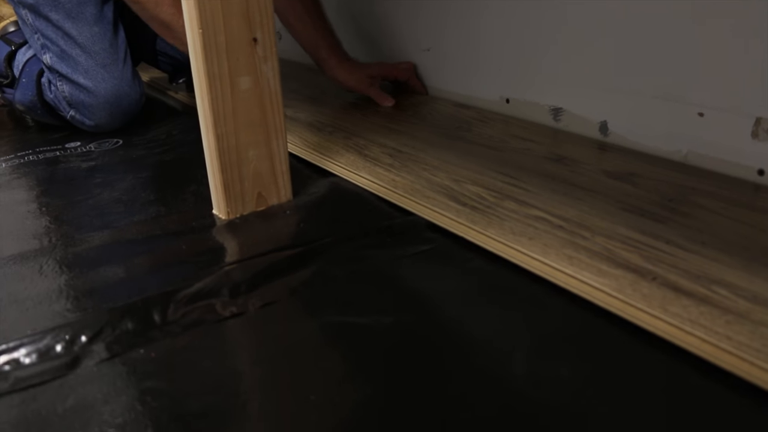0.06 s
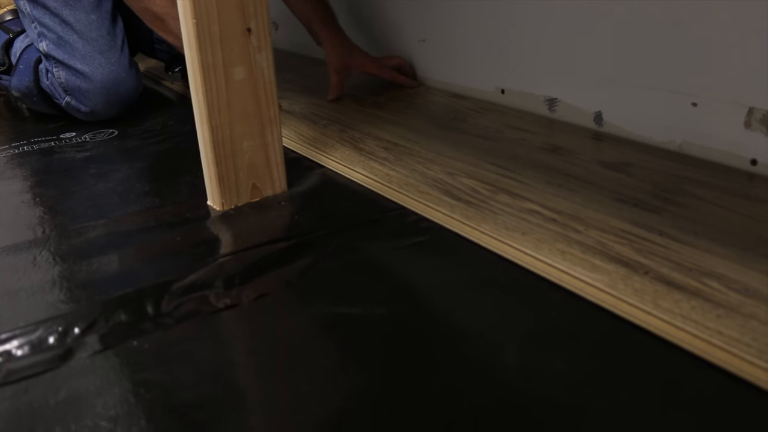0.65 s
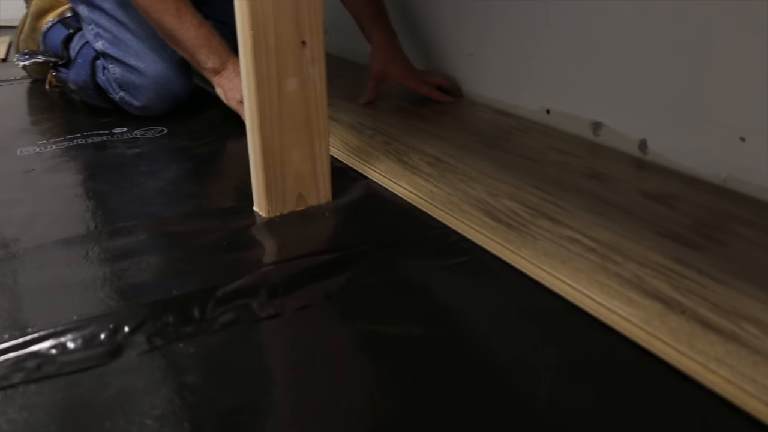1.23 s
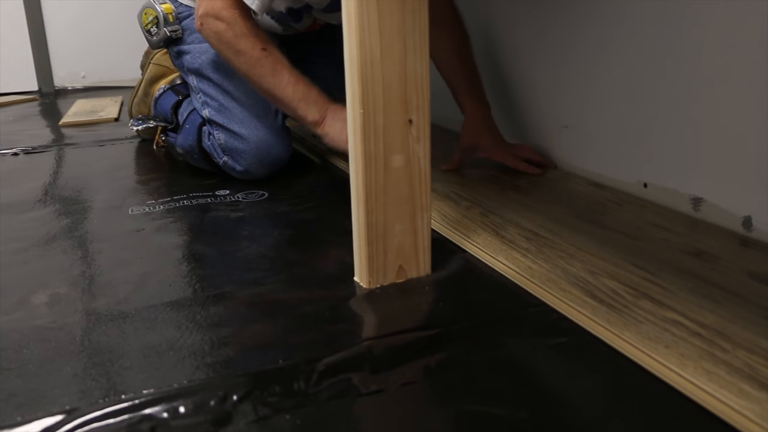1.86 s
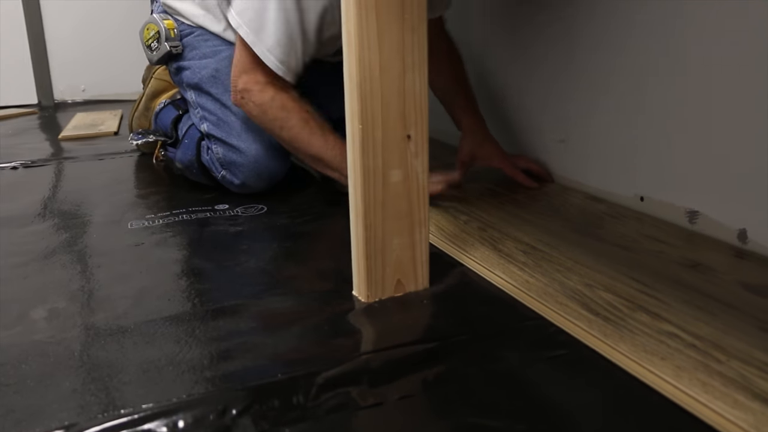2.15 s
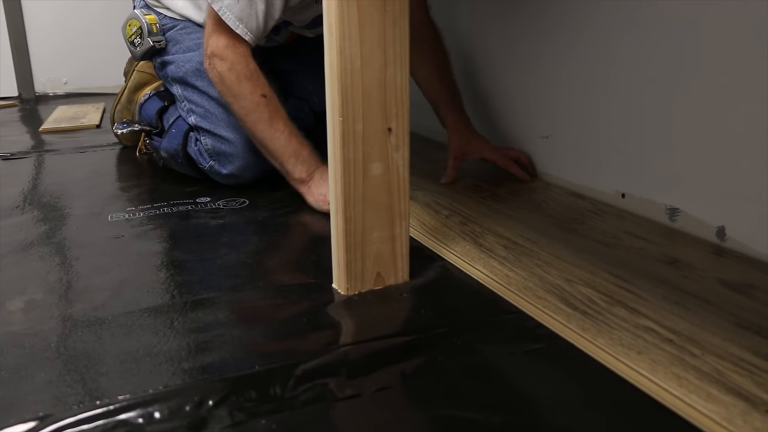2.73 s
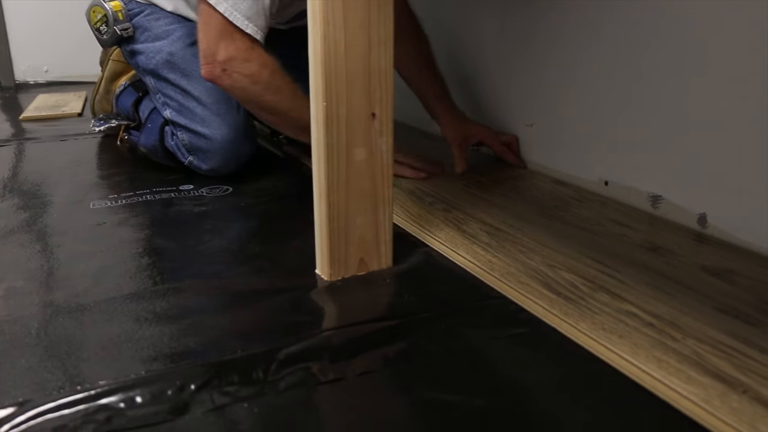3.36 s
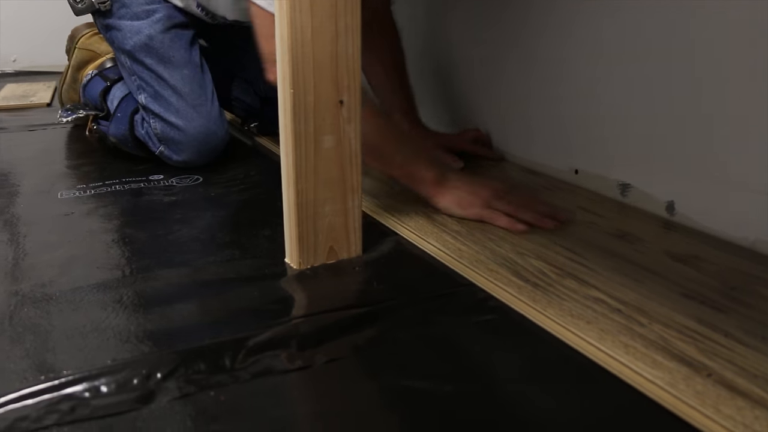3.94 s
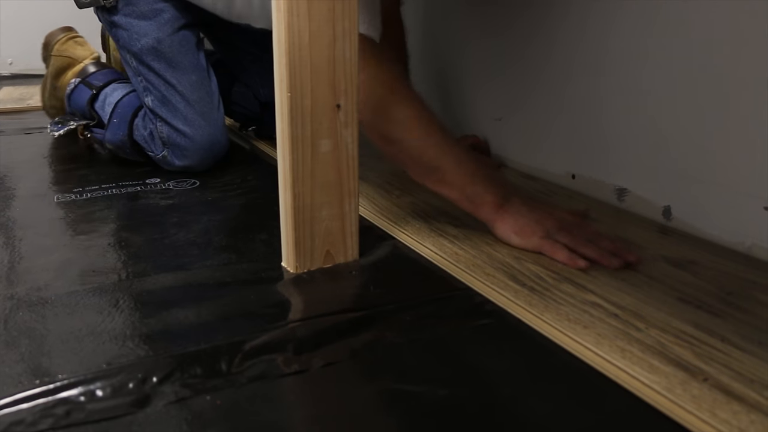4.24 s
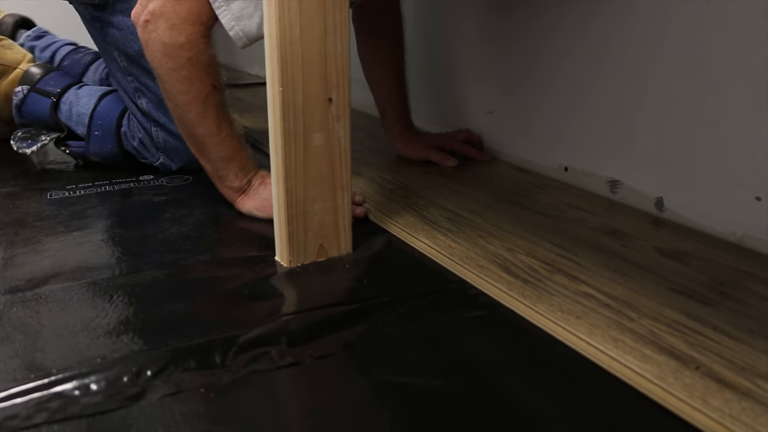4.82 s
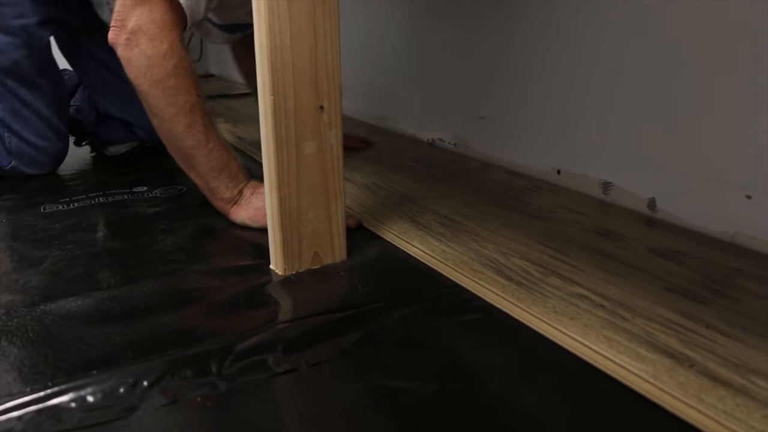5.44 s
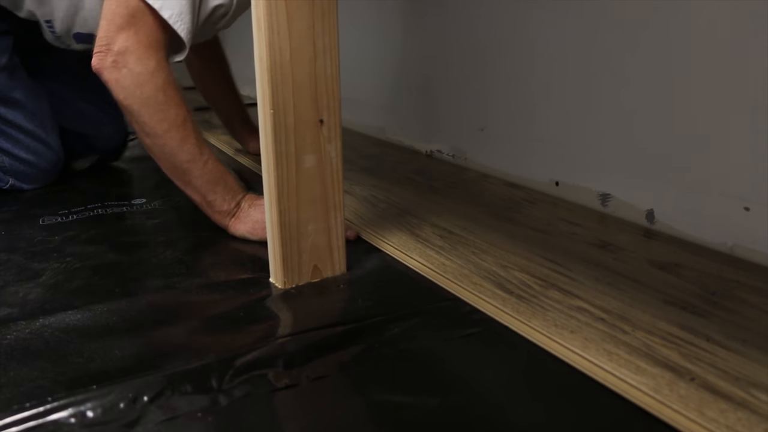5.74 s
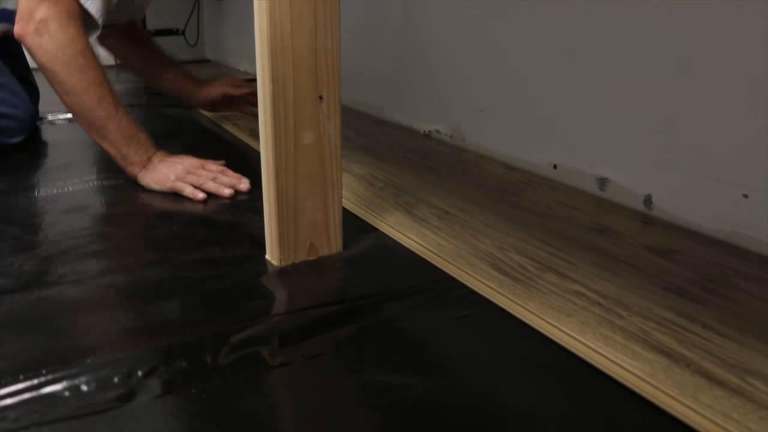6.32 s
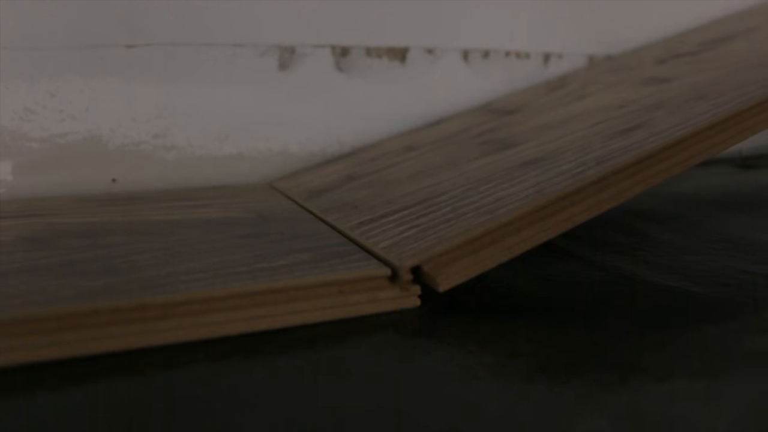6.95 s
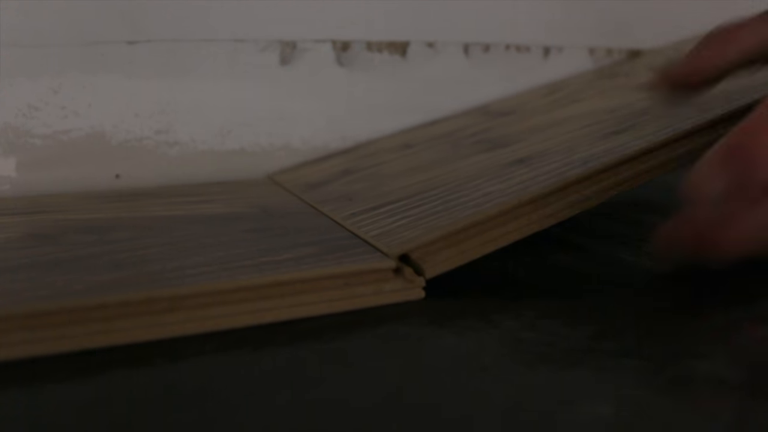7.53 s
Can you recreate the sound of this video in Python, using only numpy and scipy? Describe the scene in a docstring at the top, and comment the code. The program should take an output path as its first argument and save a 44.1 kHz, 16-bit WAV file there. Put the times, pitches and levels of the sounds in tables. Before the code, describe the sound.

In a bare room with a low steady hum, a laminate plank drops flat with one loud, woody slap and a short echo. A palm wipes along it and back with a soft hiss. Knees and hands shuffle over plastic sheeting, with faint rasps, a soft thud and a small click from the joint. Then, heard from close by, the next plank is worked into the groove with dull thuds and light scrapes.

```python
"""A bare room: a worker lays laminate planks on plastic sheeting. One plank slaps down flat and rings,
a palm wipes along it and back, knees shuffle over the sheet and the joint clicks home.
Then, heard from close by, the next plank is angled into the groove with soft thuds and scrapes.
Rubbing is a stream of tiny friction slips. Blows ring damped modes and echo off the walls."""
import sys
import numpy as np
from scipy import signal
from scipy.fft import rfft, irfft, next_fast_len
from scipy.io import wavfile
from scipy.ndimage import uniform_filter1d

SR = 44100
rng = np.random.default_rng(int(sys.argv[2]) if len(sys.argv) > 2 else 0)


def unload_audio(sound):
    """Save the sound as a 16-bit wav file, at the path given as the first command line argument."""
    columns = np.transpose(np.atleast_2d(sound))
    # keep every value between -1 and 1, then stretch to whole-number steps
    steps = np.round(np.clip(columns, -1, 1) * 32767)
    wavfile.write(sys.argv[1], SR, steps.astype(np.int16))


N = 338813
TIME_S = np.arange(N) / SR
RING_S = TIME_S[:SR // 2]  # time axis of one blow
CLOSE_S = 6.642  # the listener jumps close to the joint

# Room tone spectra, far and close. Each row: frequency in Hz, gain in dB.
FAR_AIR = [(25, -5.5), (45, -14), (85, -17), (115, -2.5), (260, -1.5), (600, -3.5), (900, -2.5), (1500, -8),
           (2000, -11), (4000, -14), (5500, -16), (7500, -15.5), (11000, -20), (15500, -27.5)]
NEAR_AIR = [(25, -24), (70, -16), (170, -4), (350, -2), (480, -7), (650, -6), (950, -5.5), (1550, -11.5),
            (2000, -12), (3000, -16.5), (5000, -20), (7500, -18.5), (10000, -23), (15500, -30)]
# Hum and drone lines, far and close. Each row: frequency in Hz, width in Hz, level in dB.
FAR_HUM = [(70.8, 7.7, -69), (205.5, 28, -73.5), (293.7, 8.9, -65), (428, 54, -64), (513, 11, -67),
           (756.3, 25, -68.5), (889, 43, -69)]
NEAR_HUM = [(140.7, 6.6, -65), (747, 100, -62), (1275, 89, -66)]
# Room echo decay. Each row: frequency in Hz, T60 in seconds.
ROOM_DECAY = [(80, 0.63), (400, 0.3244), (1200, 0.2), (4000, 0.39), (14000, 0.4)]
# Stereo width of room tone, echo and rubbing. Each row: frequency in Hz, side minus mid in dB.
AIR_WIDTH = [(60, -5), (110, 5), (200, -2.5), (380, 0), (700, -0.5), (1290, -4), (2380, -4), (4400, -2.5),
             (8120, 0.5), (15000, 0.5)]
ECHO_WIDTH = [(100, -2), (700, -5), (3000, -3.5), (9000, -1)]
RUB_WIDTH = [(800, -11), (3500, -8), (7000, -1), (11000, -1.5)]
# Spectra of the echo, three kinds of rubbing and the plank's clack. Each row: frequency in Hz, gain in dB.
ECHO_EQ = [(60, -7), (250, 2.5), (700, 8.5), (1300, 3), (2200, 4), (5000, -1.5), (14000, 4)]
PALM_EQ = [(300, -29), (900, -14), (1500, -7.5), (2500, -3), (3800, 1.5), (5200, -3), (7700, -0.5),
           (10000, -6), (13000, -4.5), (16000, -10)]
SHEET_EQ = [(300, -31), (900, -10), (1600, -4.5), (2600, 0.5), (3800, 3), (5300, -1), (7800, 3),
            (10000, -3), (13000, -2), (16000, -6)]
TONGUE_EQ = [(500, 5.5), (1500, -3), (3200, -1.5), (6000, -3), (8000, -4.5), (10000, -13), (12500, -7),
             (16000, -19.5)]
CLACK_EQ = [(35, -23), (100, 7.5), (300, 1.5), (600, 3.5), (1100, 10), (1900, -5), (3200, -5), (4000, 1.5),
            (4700, -3), (6800, -3), (9000, -10.5), (16000, -10)]
# A swell of room hum; stick-slip rasps and squeaks. Each row: middle in seconds, length in seconds,
# start pitch in Hz, end pitch in Hz, width in Hz, level in dB.
HUM_BURSTS = [(.7, 1.6, 192, 188, 25.8, -58)]
RASP_BURSTS = [(0.331, 0.033, 3000, 3000, 3400, -52.5), (3.927, 0.1, 3380, 3320, 1200, -43),
               (4.47, 0.09, 4000, 2600, 900, -50), (4.585, 0.099, 3100, 2600, 1700, -48.5),
               (4.595, 0.13, 1100, 950, 700, -52), (4.713, .06, 1250, 800, 400, -45.5),
               (4.934, 0.12, 700, 600, 600, -47.5), (5.36, .15, 12500, 12500, 5000, -58),
               (5.6, 0.16, 8000, 7600, 2500, -49), (5.952, 0.082, 3500, 3500, 5000, -47),
               (7.5, .014, 11000, 11000, 5000, -56), (7.28, .29, 5950, 5420, 470, -55.5),
               (7.545, 0.25, 3400, 2933, 1000, -55.5)]
# Palm on plank, knees and hands on sheeting, tongue in groove. Each row: start, rise, hold and fall
# in seconds, gain in dB, sag while held in dB per second, body of the touch in dB.
PALM_STROKES = [(3.79, 0.12, 0.35, 0.054, -42, 13, 2.5), (4.29, 0.15, 0.25, 0.062, -40, 24, 2)]
KNEE_STROKES = [(1.1, 0.12, .04, .08, -55, 10, -12), (3.17, 0.19, .05, 0.26, -51.5, 20, -0.5),
                (3.55, 0.15, 0.054, 0.14, -55, 10, -12), (4.82, 0.068, .04, 0.15, -52.5, 20, 3),
                (5.26, 0.25, 0.14, 0.072, -45, -2, 0), (5.72, 0.23, .03, .05, -53, 10, 2.5),
                (5.97, .09, 0.034, 0.083, -38, 12, -0.5), (6.23, .16, .05, 0.078, -51, 20, 0),
                (6.47, 0.17, .03, .05, -39.5, 10, -1.5)]
TONGUE_STROKES = [(7.11, 0.16, .17, .06, -48.5, 42, 0.5), (7.43, 0.032, 0.12, .05, -57.5, 16, 3),
                  (7.625, .025, .03, .05, -55, 10, -3)]
# Modes of underlay, joint and flat plank. Each row: frequency in Hz, level in dB, T60 in seconds.
UNDERLAY_MODES = [(83.5, -0.5, 0.2), (182, -13.5, 0.081), (540, -20, 0.078)]
JOINT_MODES = [(720, -20, 0.058), (875, 3.5, 0.022), (1282.6, -1.5, 0.02), (1670, -10.5, 0.024),
               (4100, -30, .015)]
PLANK_MODES = [(109.9, -41, .15), (184, -17.5, 0.13), (408, -30.5, 0.2), (564, -14.5, 0.11),
               (690, -28, 0.073), (940, -14, 0.021), (1130, -31, 0.043), (1255, -26, 0.089),
               (1352, -15, 0.061), (1600, -41, 0.045), (2350, -24, 0.027), (2970, -24, 0.028),
               (3980, -19, 0.017), (4200, -22, 0.016)]
# Soft blows on the padded floor. Each row: time in seconds, gain in dB, push in Hz, push cycles, relative
# ring and first rebound in dB, rebound gap in seconds, left minus right in dB.
FLOOR_THUDS = [(5.542, -33, 415, 1.3, -22, -3, .008, 6), (6.948, -39.5, 124, 1.8, -14, -8, .022, -9),
               (7.192, -19.5, 323, 0.62, -7, -25, .02, 2.5), (7.312, -38.5, 300, 1.2, -14, -16, .01, -2),
               (7.3735, -29.5, 465, 1.14, -20, -7, .008, -7),
               (7.38, -22.5, 155, 1.2, -27, -10.5, .018, -13)]
# Tongue ticks in the groove. Each row: time in seconds, gain in dB, cutoff in Hz, left minus right in dB.
JOINT_TICKS = [(3.342, -41, 3000, -2), (4.868, -43, 2500, -2), (5.933, -40, 5000, -3),
               (5.939, -43, 1500, -3), (5.9462, -40, 3000, -1), (5.9515, -23, 1000, -10),
               (5.962, -41, 2000, -4)]
# The plank lands along its length. Each row: time in seconds, gain in dB, cutoff in Hz,
# bending-wave delay near 1 kHz in seconds, left minus right in dB.
SLAP_CONTACTS = [(2.228, 4.5, 6000, 0.00093, 4), (2.2299, 7, 10900, .0004, -5), (2.23, 8, 1600, .0019, 6),
                 (2.2330, 10, 3000, 0.00342, -7), (2.2364, 13, 800, 0.00206, -6),
                 (2.2409, 11.5, 450, 0.00202, 12)]


def undb(db):
    """Decibels to gain."""
    return 10 ** (np.asarray(db) / 20)


def along(hz, points):
    """Interpolate (Hz, value) points over log frequency."""
    f, value = np.transpose(points)
    return np.interp(np.log(np.maximum(hz, 1)), np.log(f), value)


def colour(x, points):
    """Filter by (Hz, dB) points."""
    size = next_fast_len(x.shape[-1], real=True)
    hz = np.fft.rfftfreq(size, 1 / SR)
    return irfft(rfft(x, size) * undb(along(hz, points)), size)[..., :x.shape[-1]]


def level(x, db):
    """Set the rms level."""
    return x * undb(db) / np.sqrt(np.mean(x ** 2))


def lowpass(x, hz):
    """Two-pole low-pass."""
    return signal.sosfilt(signal.butter(2, min(hz, SR / 2 - 1), fs=SR, output="sos"), x)


def highpass(x, hz):
    """Two-pole high-pass."""
    return signal.sosfilt(signal.butter(2, hz, "high", fs=SR, output="sos"), x)


def resonate(x, hz, width_hz):
    """Two equal resonances in series."""
    b, a = signal.iirpeak(hz, hz / width_hz, fs=SR)
    return signal.lfilter(b, a, signal.lfilter(b, a, x))


def stereo(mid, side):
    """Mid and side to left and right."""
    return np.array([mid + side, mid - side])


def widen(pair, width):
    """Two unrelated signals to stereo, width set by frequency."""
    return stereo(pair[0], colour(pair[1], width))


def pan(db):
    """Channel gains for left minus right in dB."""
    return undb(np.array([[db], [-db]]) / 2)


def add(out, start_s, x):
    """Mix x into out."""
    i = int(start_s * SR)
    out[:, i:i + x.shape[-1]] += x[..., :N - i]


def walk(rate_hz):
    """Slow random drift, unit rms."""
    k = int(SR / rate_hz)
    steps = np.repeat(rng.standard_normal(N // k + 1), k)
    return level(uniform_filter1d(steps, k)[:N], 0)


def decay(t60_s):
    """Exponential fall after one blow."""
    return np.exp(-np.log(1000) * RING_S / t60_s)


def ring(modes):
    """Damped modes after one blow."""
    return sum(undb(db) * decay(t60_s) * np.sin(2 * np.pi * hz * RING_S) for hz, db, t60_s in modes)


def bursts(pair, rows, side_db=-7, skirt=1.08):
    """Swells of a random drive, each through a gliding resonance."""
    out, drive = np.zeros((2, N)), stereo(pair[0], undb(side_db) * pair[1])
    for middle_s, length_s, start_hz, end_hz, width_hz, db in rows:
        start_s = max(middle_s - length_s / 2, 0)
        burst = drive[:, int(start_s * SR):int((start_s + length_s) * SR)]
        glide_hz = np.linspace(start_hz, end_hz, burst.shape[1])
        carrier = np.exp(2j * np.pi * np.cumsum(glide_hz) / SR)
        burst = np.real(carrier * lowpass(burst / carrier, width_hz / 2 / skirt))
        add(out, start_s, level(burst, db) * np.hanning(burst.shape[1]))
    return out


def room_tone(far_db=-49, near_db=-52.5, waver_db=0.5):
    """Air noise and steady hum lines; duller and quieter by the joint."""
    air = widen(rng.standard_normal((2, N)), AIR_WIDTH)
    drive, tones = rng.standard_normal(N), []
    for spectrum, air_db, lines in (FAR_AIR, far_db, FAR_HUM), (NEAR_AIR, near_db, NEAR_HUM):
        drone = sum(level(resonate(drive, hz, width_hz), db) for hz, width_hz, db in lines)
        tones.append(level(colour(air, spectrum), air_db) + drone)
    return np.where(TIME_S < CLOSE_S, *tones) * undb(waver_db * walk(rate_hz=8)) * pan(-1.36)


def room_hum():
    """The room's hum swells faintly."""
    return bursts(rng.standard_normal((2, N)), HUM_BURSTS)


def room_echo(x, wet_db, first_s=0.0016, build_s=0.011):
    """Add each channel's diffuse echoes: they build from the nearest wall and die band by band."""
    octave = np.log2(np.clip(np.fft.rfftfreq(len(RING_S), 1 / SR), 2 ** 6, 2 ** 14))
    onset = np.clip((RING_S - first_s) / build_s, 0, 1)
    out = x
    for channel in x:
        noise, tail = rfft(widen(rng.standard_normal((2, len(RING_S))), ECHO_WIDTH)), 0
        for k in range(6, 15):
            band = irfft(noise * np.maximum(1 - abs(octave - k), 0), len(RING_S))
            tail = tail + band * decay(along(2 ** k, ROOM_DECAY))
        tail = colour(tail / np.sqrt(np.sum(tail ** 2)), ECHO_EQ) * onset
        out = out + undb(wet_db) * signal.fftconvolve(channel[None], tail, axes=1)[:, :N]
    return out


def slips(per_s, spread_db):
    """Two streams of tiny friction clicks of uneven size."""
    clicks = np.zeros((2, N))
    slipping = rng.random((2, N)) < per_s / SR
    size = rng.standard_normal((2, N))[slipping]
    clicks[slipping] = undb(spread_db * size)
    return clicks - clicks.mean()


def rasps():
    """Skin, cloth or a plank edge catches and chatters."""
    return bursts(slips(per_s=1500, spread_db=-1), RASP_BURSTS)


def stroke(age_s, rise_s, hold_s, fall_s, sag_db_per_s):
    """Envelope of a slide: speed up, sag, brake."""
    speed_up = np.clip(age_s / rise_s, 0, 1) ** 0.88
    brake = np.clip((rise_s + hold_s + fall_s - age_s) / fall_s, 0, 1) ** 1.07
    return speed_up * brake * undb(-sag_db_per_s * np.clip(age_s - rise_s, 0, hold_s))


def rub(strokes, spectrum, pan_db, flutter_db, onset_body_db, settle_s, body_hz=3000):
    """Dense slips on a fine texture. Pressure flutters; the low band shifts as the touch settles."""
    grains = widen(slips(per_s=9000, spread_db=0.5), RUB_WIDTH)
    hiss = level(colour(highpass(grains, 250), spectrum), 0)
    body = colour(hiss, [(body_hz / 2, 0), (body_hz, -3), (2 * body_hz, -20)])
    out = np.zeros((2, N))
    for start_s, rise_s, hold_s, fall_s, db, sag_db_per_s, body_db in strokes:
        on = (TIME_S >= start_s) & (TIME_S < start_s + rise_s + hold_s + fall_s)
        age_s = TIME_S[on] - start_s
        firmness = undb(body_db + np.interp(age_s, [0, settle_s], [onset_body_db, 0])) - 1
        envelope = undb(db) * stroke(age_s, rise_s, hold_s, fall_s, sag_db_per_s)
        out[:, on] += (hiss[:, on] + firmness * body[:, on]) * envelope
    return out * undb(flutter_db * walk(rate_hz=45)) * pan(pan_db)


def push(hz, cycles):
    """Air pushed out and back, centred 2 * cycles / hz seconds in."""
    turns = hz * RING_S - 2 * cycles
    return -np.sin(2 * np.pi * turns) * np.exp(-(2 * turns / cycles) ** 2)


def thuds(rebounds=4, loss_db=3, rebound_hz=212, rebound_cycles=1.74, jitter_s=0.0009, jitter_oct=0.29):
    """Each soft blow pushes air, rings the underlay and dies in weakening rebounds."""
    out = np.zeros((2, N))
    for start_s, db, hz, cycles, ring_db, rebound_db, gap_s, pan_db in FLOOR_THUDS:
        add(out, start_s - 2 * cycles / hz, undb(db) * pan(pan_db) * push(hz, cycles))
        add(out, start_s, -undb(db + ring_db) * pan(pan_db) * lowpass(ring(UNDERLAY_MODES), 2 * hz))
        for k, (late, higher) in enumerate(rng.standard_normal((rebounds, 2))):
            at_s = start_s + (k + 1) * gap_s + jitter_s * late
            pitch_hz = np.sqrt(hz * rebound_hz) * 2 ** (jitter_oct * higher)
            gain = undb(db + rebound_db - k * loss_db) * pan(-2)
            add(out, at_s - 2 * rebound_cycles / pitch_hz, gain * push(pitch_hz, rebound_cycles))
    return out


def ticks(snap_db=2):
    """The tongue slips in the groove: a tiny snap and a hollow, woody ring."""
    out, blow = np.zeros((2, N)), ring(JOINT_MODES)
    blow[0] += undb(snap_db)
    for start_s, db, cutoff_hz, pan_db in JOINT_TICKS:
        add(out, start_s, undb(db) * pan(pan_db) * lowpass(blow, cutoff_hz))
    return highpass(out, 620)


def clack_spectrum(hz, gain_db=5):
    """The plank's dead clack as a minimum-phase click."""
    cepstrum = irfft(np.log(undb(along(hz, CLACK_EQ) + gain_db)), len(RING_S))
    cepstrum[1:] *= 2 * (RING_S[1:] < RING_S[-1] / 2)
    return np.exp(rfft(cepstrum))


def edge_scatter(gain_db=-2, side_db=-8):
    """Short waves scatter off the plank's edges and the wall beside it."""
    mid, side = highpass(rng.standard_normal((2, len(RING_S))), 1100) * decay(t60_s=0.021)
    return stereo(mid, undb(side_db) * side) * undb(gain_db) / np.sqrt(np.sum(mid ** 2))


def slap(flat_s=2.2316, slowest_hz=90):
    """The plank hits at several spots and rings once flat; bending waves bring treble before bass."""
    out, hz = np.zeros((2, N)), np.fft.rfftfreq(len(RING_S), 1 / SR)
    fade = np.clip(2 - 2.5 * RING_S / RING_S[-1], 0, 1)
    clack = clack_spectrum(hz)
    for start_s, db, cutoff_hz, delay_s, pan_db in SLAP_CONTACTS:
        dispersion = np.exp(-4j * np.pi * delay_s * np.sqrt(1000 * (hz + slowest_hz)))
        blow = irfft(clack * (1 + rfft(edge_scatter())) * dispersion, len(RING_S)) * fade
        add(out, start_s, undb(db) * pan(pan_db) * lowpass(blow, cutoff_hz))
    add(out, flat_s, pan(-3) * ring(PLANK_MODES))
    return highpass(out, 60)


def scene():
    """Echoing blows and dry rubbing over the room tone."""
    blows = room_echo(slap(), wet_db=-9) + room_echo(ticks() + thuds(), wet_db=-10)
    palm = rub(PALM_STROKES, PALM_EQ, pan_db=-1.8, flutter_db=0.9, onset_body_db=-12, settle_s=0.27)
    knees = rub(KNEE_STROKES, SHEET_EQ, pan_db=0.5, flutter_db=0.75, onset_body_db=0.5, settle_s=0.12,
                body_hz=5000)
    tongue = rub(TONGUE_STROKES, TONGUE_EQ, pan_db=1.5, flutter_db=1.6, onset_body_db=2, settle_s=0.091)
    return blows + palm + knees * (TIME_S < CLOSE_S) + tongue + room_hum() + rasps() + room_tone()


def record(dry, top_hz=15800):
    """Clip at full scale, then low-pass steeply."""
    return signal.sosfilt(signal.ellip(10, .1, 70, top_hz, fs=SR, output="sos"), np.clip(dry, -1, 1))


dry = scene()
out = record(dry)
unload_audio(out)
```